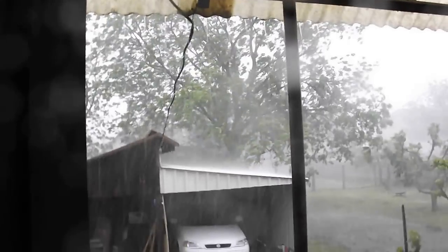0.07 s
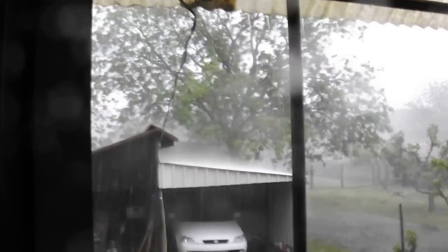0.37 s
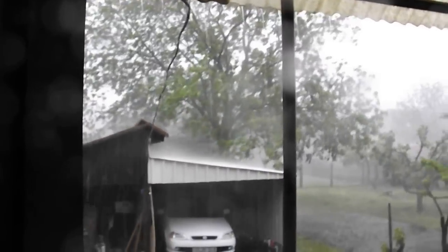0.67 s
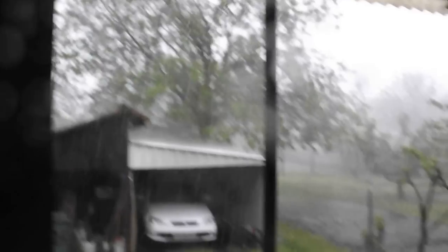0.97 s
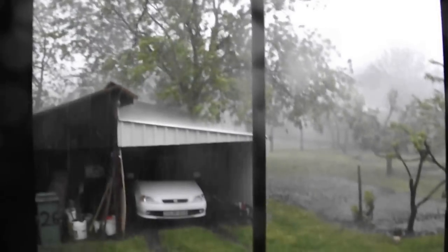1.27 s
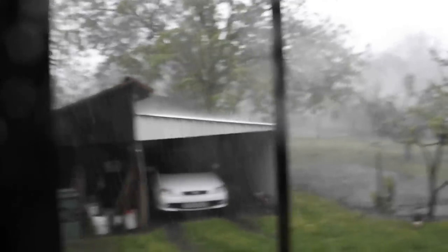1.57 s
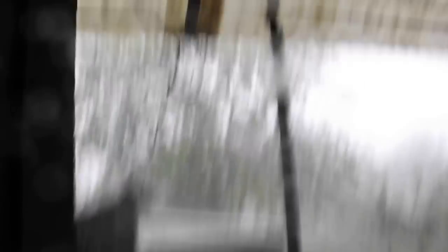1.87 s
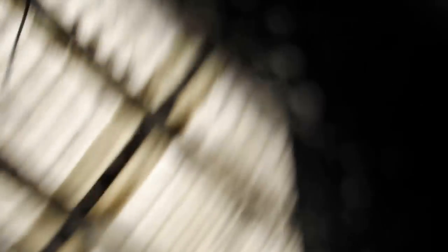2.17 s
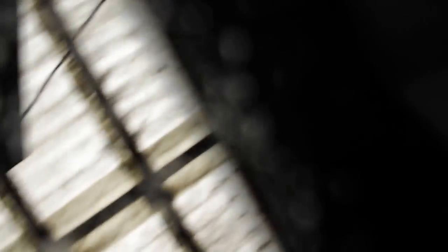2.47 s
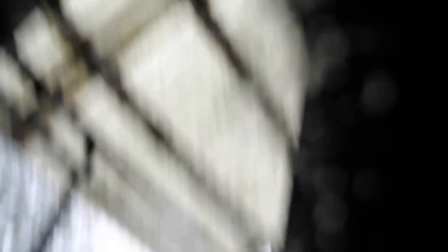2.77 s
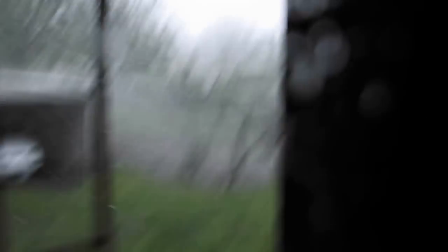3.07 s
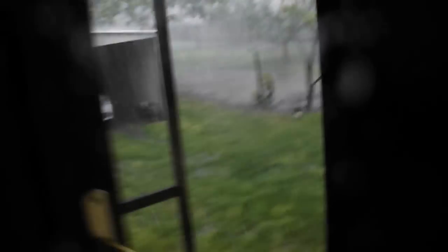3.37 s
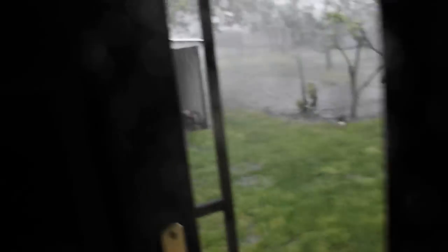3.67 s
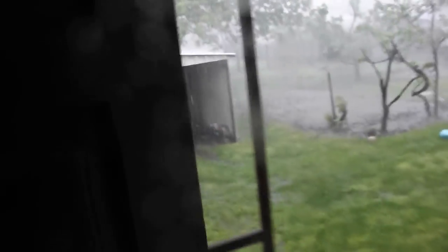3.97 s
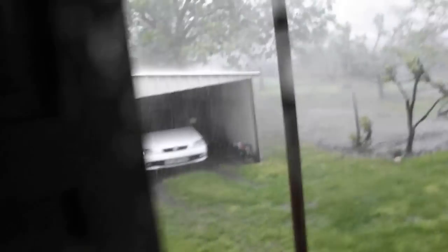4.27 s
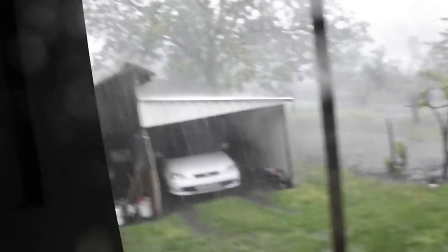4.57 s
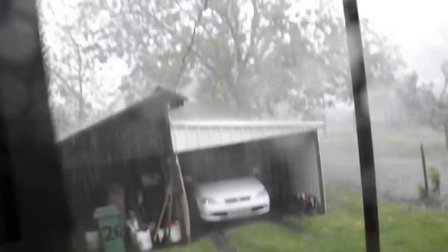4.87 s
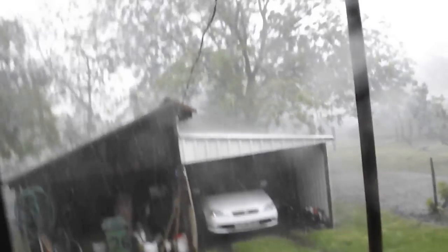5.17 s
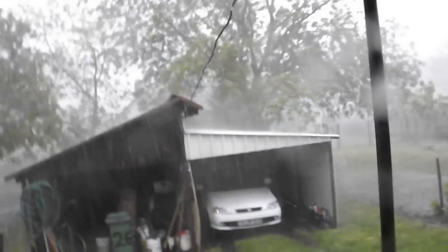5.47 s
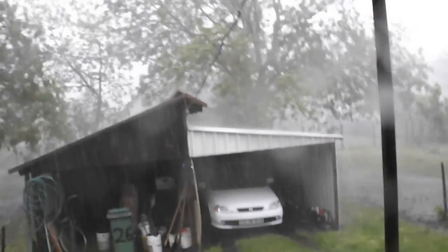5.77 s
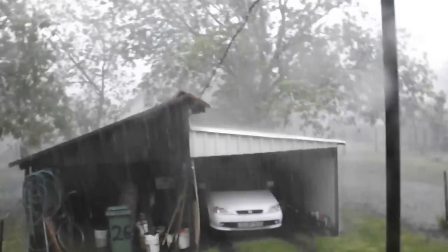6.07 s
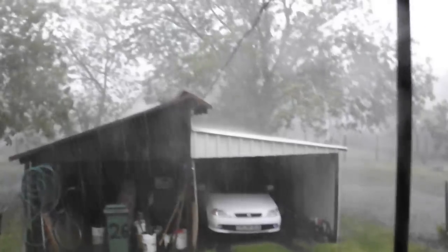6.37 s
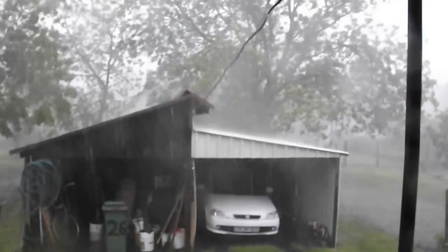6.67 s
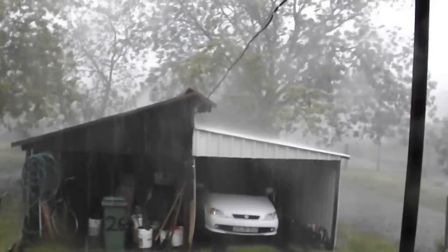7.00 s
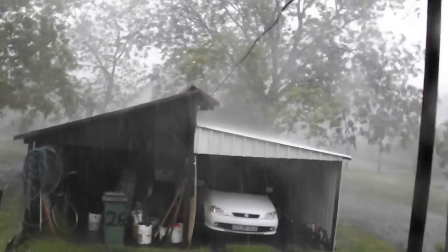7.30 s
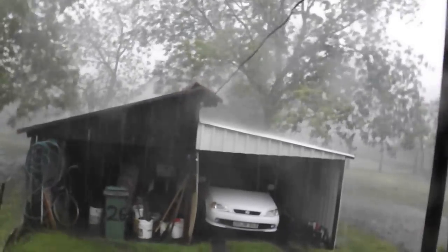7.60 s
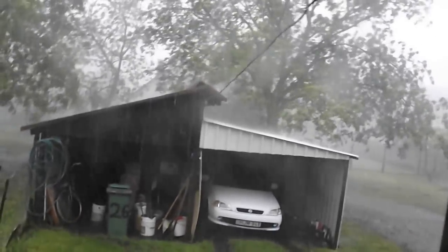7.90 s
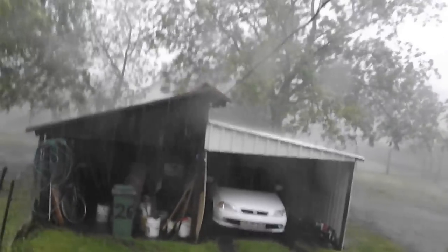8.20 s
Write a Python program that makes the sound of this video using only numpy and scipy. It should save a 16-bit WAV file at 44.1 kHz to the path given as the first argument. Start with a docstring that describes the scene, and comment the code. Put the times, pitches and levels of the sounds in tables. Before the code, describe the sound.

Heavy rain drums on a corrugated roof and hisses in the yard, with wind buffeting the microphone and drips splashing close by.

```python
"""Heavy rain drums on a corrugated roof, then hisses in the open yard as the microphone turns that way.
Gusts buffet the microphone, fat drops knock on the sheets and drips from the eaves splash close by.
Patter and drips ring the single small microphone near 3 kHz; a limiter ducks the rain after each peak."""
import sys
import numpy as np
from scipy import signal
from scipy.fft import rfft, irfft, next_fast_len
from scipy.io import wavfile
from scipy.ndimage import uniform_filter1d, minimum_filter1d, map_coordinates

SR = 44100
rng = np.random.default_rng(int(sys.argv[2]) if len(sys.argv) > 2 else 0)


def wrap_up_sound(samples):
    """Save the sound to the file named by the first command line argument, as 16-bit audio."""
    columns = np.atleast_2d(samples).T
    # keep every value between -1 and 1, then stretch to whole-number steps
    tamed = np.clip(columns, -1, 1)
    steps = np.round(tamed * 32767).astype(np.int16)
    wavfile.write(sys.argv[1], SR, steps)


N = 367794
TIME = np.arange(N) / SR

# where the microphone faces: t/s, roof gain/dB, yard gain/dB
MIC_FACING = [(0, -2, -5), (1.1, 1.5, -6.5), (1.8, 1, -2.5), (2.2, -4, -1.5), (3.3, -1, 2.5),
              (3.9, -3.5, 1), (4.6, -9, 1.5), (5.1, -5, 2), (6.2, -14, 3), (8.34, -27, 2.5)]
# microphone resonance: f/Hz, width/Hz, gain/dB
MIC_MODES = [(3092, 790, 7)]
# spectrum of roof roar: f/Hz, level/dB
ROAR_SPECTRUM = [(20, 4), (65, 4), (120, 1), (175, 1.5), (230, -3.5), (310, -4.5), (450, -0.5), (560, 0),
                 (750, -1), (1600, 0), (2000, -2.5), (2700, 1.5), (4000, -28), (8000, -49)]
# spectrum of drop taps: f/Hz, level/dB
PATTER_SPECTRUM = [(300, -24.5), (1500, -9), (2400, -6), (3100, -3), (3800, -7), (4600, -11), (5300, -18.5),
                   (8000, -30.5), (15000, -47.5)]


def amp(db):
    """Decibels to gain."""
    return 10 ** (np.asarray(db) / 20)


def unit(x):
    """x scaled to rms 1."""
    return x / np.sqrt(np.mean(x ** 2) + 1e-20)


def curves(rows):
    """Each column after t/s, interpolated per sample."""
    times, *columns = np.transpose(rows)
    return [np.interp(TIME, times, column) for column in columns]


def wobble(knots_per_s):
    """Smooth random curve."""
    knots = rng.standard_normal(int(N * knots_per_s / SR) + 4)
    return map_coordinates(knots, [TIME * knots_per_s])


def coloured(x, spectrum, size=8192):
    """x through a minimum-phase filter with outline f/Hz, level/dB."""
    hz, db = np.transpose(spectrum)
    grid_hz = np.fft.rfftfreq(size, 1 / SR)
    gain = amp(np.interp(np.log(grid_hz + 1), np.log(hz), db))
    cepstrum = irfft(np.log(gain))
    cepstrum[1:size // 2] *= 2
    cepstrum[size // 2 + 1:] = 0
    return signal.fftconvolve(x, irfft(np.exp(rfft(cepstrum))))[:N]


def resonances(x, modes):
    """x rung through parallel modes: f/Hz, width/Hz, gain/dB."""
    return sum(amp(db) * signal.lfilter(*signal.iirpeak(hz, hz / width_hz, SR), x)
               for hz, width_hz, db in modes)


def drops(per_s, spread_db):
    """Impacts at random times: many small, a few large."""
    falls = rng.random(N) < per_s / SR
    sizes = amp(spread_db * np.clip(rng.standard_normal(N), -3, 2.5))
    return unit(falls * sizes * rng.choice([-1, 1], N))


def scattered(x, t60_s, wet_db):
    """A short wash follows each impact: droplets thrown up, echoes under the roof."""
    pole = amp(-120 / (t60_s * SR))
    energy = signal.lfilter([1 - pole], [1, -pole], x ** 2)
    return x + amp(wet_db) * np.sqrt(np.abs(energy)) * rng.standard_normal(N)


def smacks(events, t60_s, tail_db, tail_t60_s=0.075, attack_s=0.0003):
    """A noise burst with a weaker, longer wash for each t/s, level/dB."""
    out, t = np.zeros(N + SR), np.arange(SR // 10) / SR
    attack = 1 - np.exp(-t / attack_s)
    envelope = attack * (amp(-60 * t / t60_s) + amp(tail_db - 60 * t / tail_t60_s))
    for start_s, db in events:
        out[round(start_s * SR):][:len(t)] += amp(db) * envelope * rng.standard_normal(len(t))
    return out[:N]


def rain_level_db():
    """Steady rain swells as squalls fling extra water; drops arrive in uneven clumps."""
    # rain strength: t/s, level/dB
    strength = [(0, -18), (1.05, -16), (1.4, -17.5), (2.2, -17), (3.3, -16), (3.7, -18), (4.3, -19),
                (4.65, -18), (4.9, -16.5), (6.8, -15.5), (8.34, -16)]
    # squalls: peak t/s, width/s, rise/dB
    squalls = [(1.093, 0.22, 0.8), (1.427, 0.033, 4), (2.13, 0.19, 2), (2.534, 0.046, 2), (3.32, 0.17, 4),
               (3.846, 0.081, 6), (4.035, .08, 2.5), (4.315, 0.056, 3), (4.88, 0.084, 2),
               (5.73, 0.057, 7.5), (5.975, 0.23, 1), (6.875, 0.12, 2.5), (7.676, 0.06, 4)]
    steady_db, = curves(strength)
    squall_db = sum(db * np.exp(-(2 * (TIME - peak_s) / width_s) ** 2) for peak_s, width_s, db in squalls)
    clump_db = 0.91 * wobble(knots_per_s=20) + 0.41 * wobble(knots_per_s=60)
    return steady_db + squall_db + clump_db


def sheets(blows, contact_hz):
    """Roof sheets ring under soft blows of water, which carry little above contact_hz."""
    # sheet resonances: f/Hz, width/Hz, gain/dB
    sheet_modes = [(153, 24, -5.5), (293, 48, -2), (340, 65, -6.5), (857, 154, -3.5), (1370, 510, -6),
                   (1594, 243, 1), (3344, 320, 7)]
    soft = signal.sosfilt(signal.butter(4, contact_hz, fs=SR, output="sos"), blows)
    return resonances(soft, sheet_modes)


def rain():
    """Drops ring the sheets overhead and patter all around; farther roofs roar, the yard hisses."""
    # spectrum of yard splashes: f/Hz, level/dB
    yard_spectrum = [(1000, -10.5), (3000, 4), (4600, 4.5), (5400, -3), (6600, -3), (8300, -13),
                     (10200, -15.5), (11400, -24.5), (14000, -28), (15800, -41)]
    roof_db, yard_db = curves(MIC_FACING)
    level_db = rain_level_db()
    large = drops(per_s=220, spread_db=3.5)
    impacts = drops(per_s=4000, spread_db=2.5) + amp(-4.5) * large
    overhead = scattered(drops(per_s=1500, spread_db=2.5), t60_s=0.086, wet_db=-4)
    drum = unit(sheets(overhead, contact_hz=3780))
    roar = unit(coloured(scattered(impacts, t60_s=0.062, wet_db=2.5), ROAR_SPECTRUM))
    taps = coloured(scattered(impacts, t60_s=0.025, wet_db=-1), PATTER_SPECTRUM)
    patter = unit(taps + 0.87 * resonances(taps, MIC_MODES))
    splashes = 0.5 * impacts + drops(per_s=5000, spread_db=6.5)
    hiss = unit(coloured(scattered(splashes, t60_s=0.052, wet_db=3.5), yard_spectrum))
    near = amp(roof_db - 4.5) * drum + amp(0.029 * yard_db) * patter
    far = amp(yard_db - 12.5) * hiss + amp(-7) * roar
    return amp(level_db) * (near + far)


def gust(start_s, length_s, attack_s=0.085, release_s=0.048):
    """Gust envelope: rises, holds, dies away."""
    rise = np.clip((TIME - start_s) / attack_s, 0, 1)
    return rise * np.exp(-np.maximum(TIME - start_s - length_s, 0) / release_s)


def wind():
    """Gusts flutter on the microphone; the hardest eddies slap it for a cycle or two."""
    # gusts: start t/s, length/s, level/dB
    gusts = [(-.12, 0.41, -14), (1.68, 0.094, -24), (2.08, 0.21, -18), (2.325, 0.42, -14),
             (2.95, 0.42, -17), (3.45, 0.48, -16.5), (3.943, 0.56, -15.5), (4.416, 0.43, -17.5),
             (5.06, 0.4, -24.5), (5.48, 0.35, -28.5)]
    # spectrum of buffeting: f/Hz, level/dB
    buffet_spectrum = [(8, -5.5), (20, 8), (45, -3), (80, -7), (140, -10.5), (220, -24), (400, -28.5),
                       (1000, -57.5)]
    # eddy slaps: t/s, level/dB, f/Hz
    slaps = [(0.019, 2.5, 90), (0.12, -3, 60), (2.546, 1.5, 55), (2.595, 3, 46), (2.656, -5.5, 138),
             (3.27, -20, 35), (3.621, -4, 25.5), (3.73, -6.5, 110), (3.83, -5.5, 70.5), (4.04, -8, 105),
             (4.097, -4.5, 24.4), (4.343, 1.5, 122), (4.363, -1, 207), (4.535, -8.5, 100), (4.69, -9.5, 55),
             (5.409, -11, 100)]
    breeze = amp(-45)
    force = breeze + np.max([amp(db) * gust(start_s, length_s) for start_s, length_s, db in gusts], axis=0)
    flutter_db = 2.4 * wobble(knots_per_s=20)
    buffet = unit(coloured(rng.standard_normal(N), buffet_spectrum))
    air = force * amp(flutter_db - 2.5) * buffet
    t = np.arange(SR // 8) / SR
    for start_s, db, hz in slaps:
        cycles = hz * t
        swell = np.exp(-cycles / 0.76) * (1 - np.exp(-cycles / 0.047))
        air[round(start_s * SR):][:len(t)] += amp(db + 2) * swell * np.sin(2 * np.pi * cycles)
    return air


def knocks():
    """Fat drops thud on the sheets."""
    # drop impacts: t/s, level/dB
    fat_drops = [(0.9, -14), (1.12, -18), (1.421, -28), (1.56, -18), (1.653, -14), (1.683, -12),
                 (1.694, -17), (1.749, -11.5), (2.067, -16), (5.063, -21)]
    blows = smacks(fat_drops, t60_s=0.029, tail_db=-3)
    return amp(3.5) * sheets(blows, contact_hz=2580) + amp(2) * coloured(blows, ROAR_SPECTRUM)


def drips():
    """Water from the eaves lands close by with a tap and brief spray; small drips tick in between."""
    # near drips: t/s, spray level/dB, tap level/dB
    eave_drips = [(1.1248, -25, -12), (1.1404, -23, -6), (1.2411, -22, -7), (1.4458, -11, -2),
                  (1.856, -31, 4.5), (3.4, -28, 2.5), (3.5197, -13, -9), (3.601, -17, -15), (3.8382, -5, 4),
                  (4.0332, -17, -2), (4.542, -15, -1.5), (4.8252, -9, 0), (5.497, -13, 5.5),
                  (5.9205, -12, -10), (6.193, -28, 7), (6.287, -16, -22), (6.566, -17, 5.5),
                  (6.584, -10, -6), (6.9096, -11, -4), (6.9855, -11, -4), (7.145, -24, -8), (7.32, -13, -5),
                  (8.0265, -10, -8), (8.0647, -13, -9)]
    # spectrum of spray: f/Hz, level/dB
    spray_spectrum = [(500, 1.5), (3000, 7.5), (6000, 3.5), (10000, -7), (12000, -12.5), (15500, -9)]
    times, spray_db, tap_db = np.transpose(eave_drips)
    _, yard_db = curves(MIC_FACING)
    spray = smacks(zip(times, spray_db), t60_s=0.013, tail_db=-22)
    landings = smacks(zip(times, tap_db), t60_s=0.013, tail_db=-14)
    taps = amp(3) * coloured(landings, PATTER_SPECTRUM)
    small = scattered(drops(per_s=16, spread_db=2.5), t60_s=0.016, wet_db=9)
    ticks = amp(-52 + 0.5 * yard_db) * small
    return coloured(spray + ticks, spray_spectrum) + resonances(taps + amp(7) * ticks, MIC_MODES)


def limiter_gain(x, ceiling=0.88, hold_s=0.026, recovery_db_per_s=34.5):
    """Gain drops at once on a peak, holds, then climbs back."""
    over_db = 20 * np.log10(np.maximum(1, np.abs(x) / ceiling))
    over_db[0] = 7  # starts ducked
    half_hold = int(hold_s * SR / 2)
    held_db = -minimum_filter1d(-over_db, size=2 * half_hold + 1, origin=half_hold)
    climb_db = recovery_db_per_s * TIME
    duck_db = np.maximum.accumulate(held_db + climb_db) - climb_db
    return uniform_filter1d(minimum_filter1d(amp(-duck_db), size=61), size=61)


def scene():
    """All sources at one microphone, on two equal channels."""
    return np.tile(rain() + knocks() + drips() + wind(), (2, 1))


def record(dry, top_hz=15750):
    """Limiter, treble lag on the left channel, band limit."""
    # lag of left behind right: f/Hz, phase/rad
    left_lag = [(300, 0), (1000, .12), (3000, .42), (15750, 2.25)]
    limited = dry * limiter_gain(dry[0])
    size = next_fast_len(N + SR // 4, real=True)
    hz = np.fft.rfftfreq(size, 1 / SR)
    lag_rad = np.interp(hz, *np.transpose(left_lag))
    response = np.exp(0.5j * np.outer([-1, 1], lag_rad)) * (hz < top_hz)
    return irfft(rfft(limited, size) * response, size)[..., :N]


dry = scene()
out = record(dry)
wrap_up_sound(out)
```